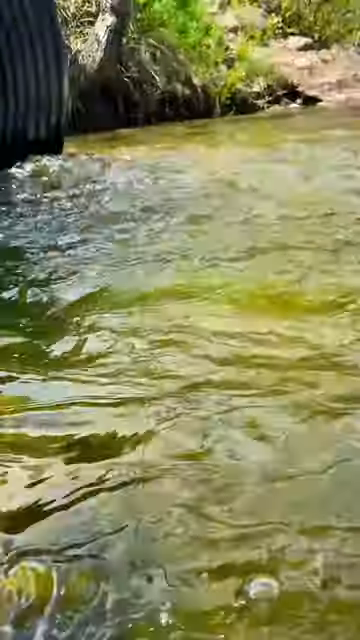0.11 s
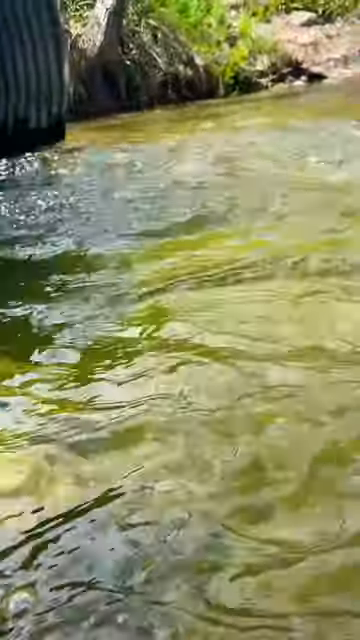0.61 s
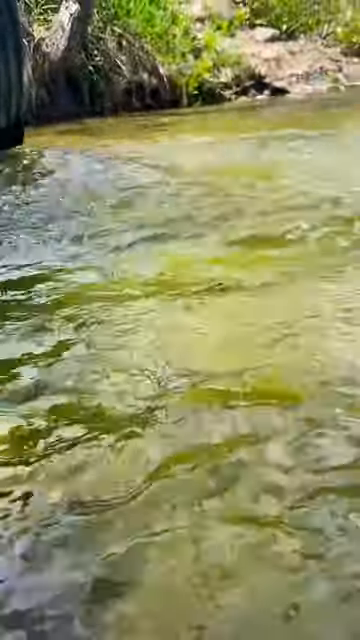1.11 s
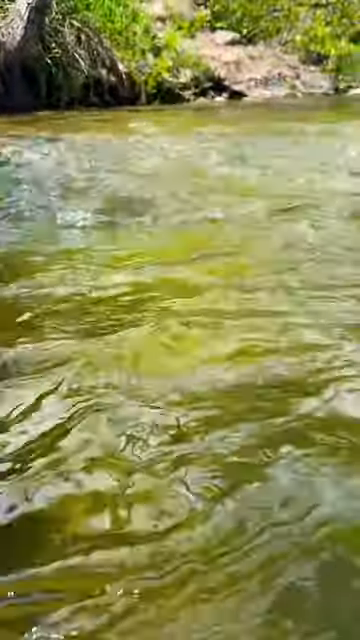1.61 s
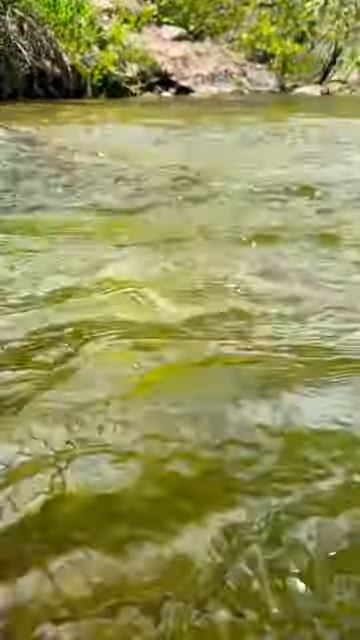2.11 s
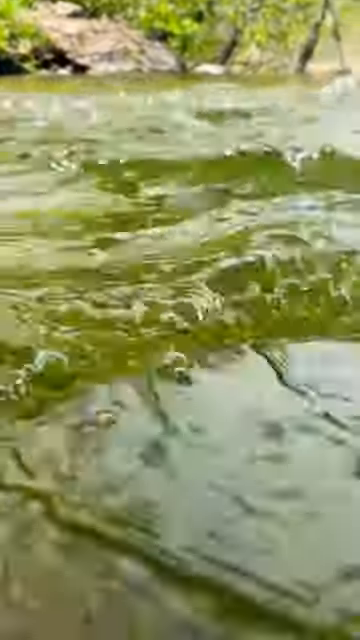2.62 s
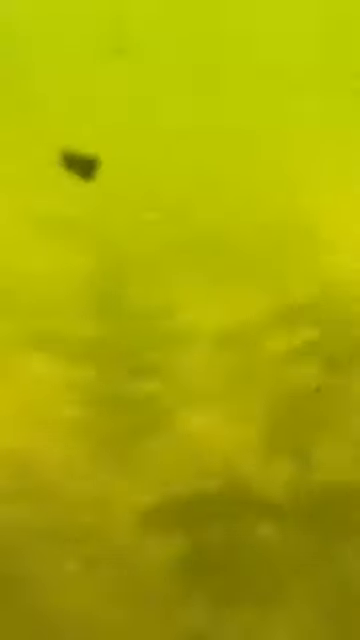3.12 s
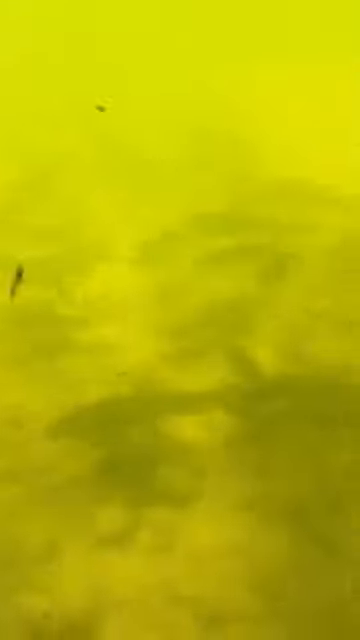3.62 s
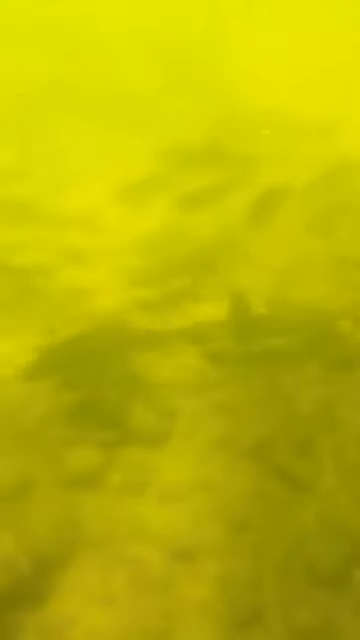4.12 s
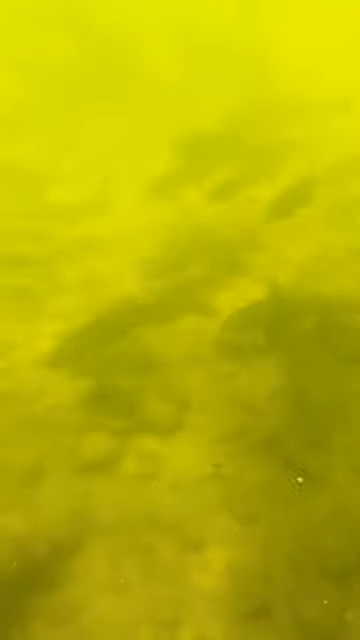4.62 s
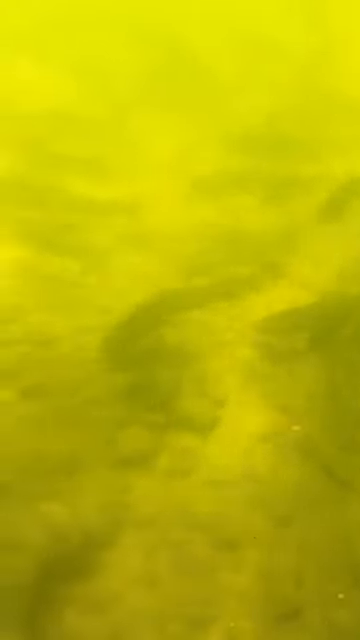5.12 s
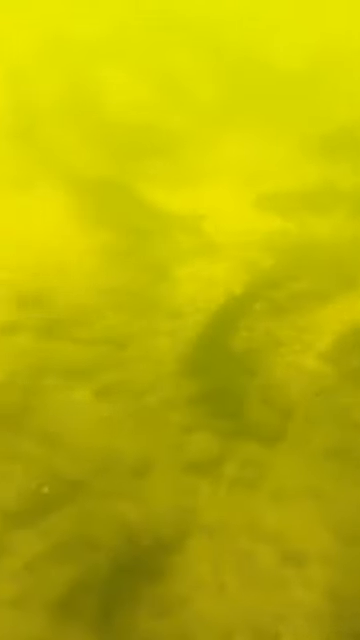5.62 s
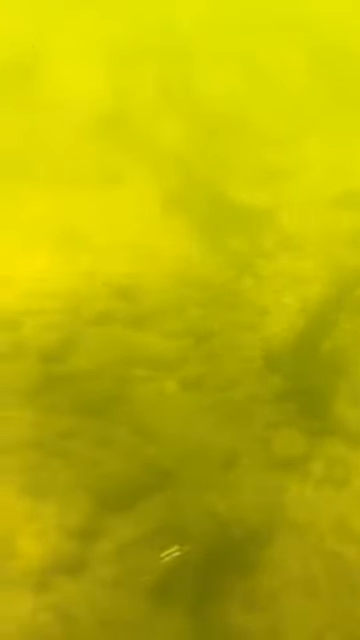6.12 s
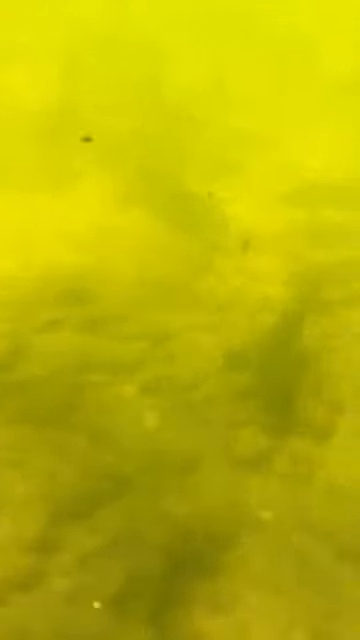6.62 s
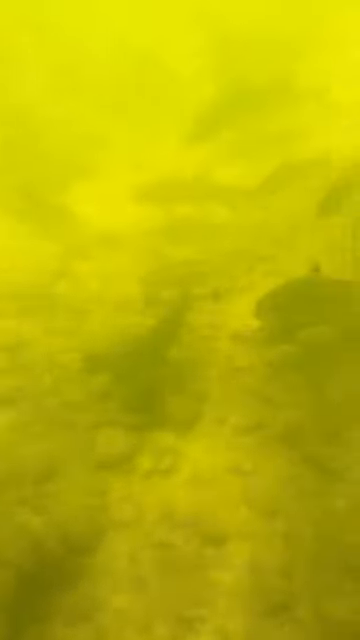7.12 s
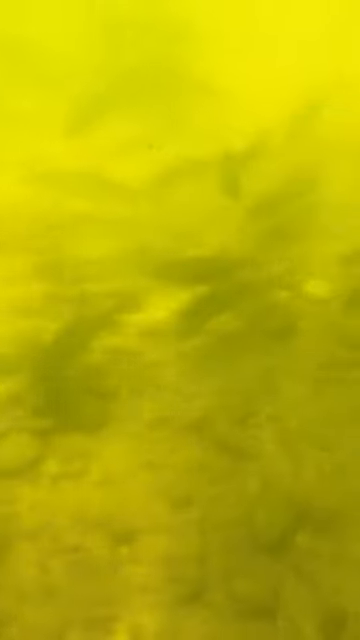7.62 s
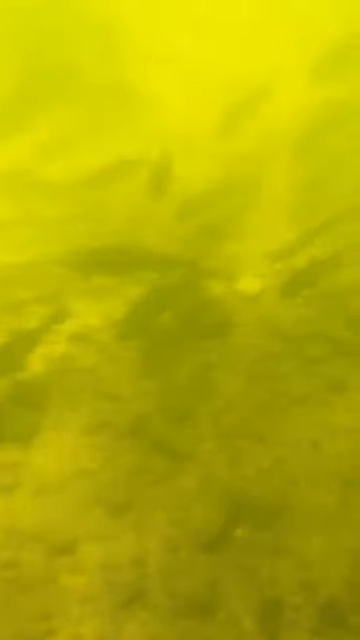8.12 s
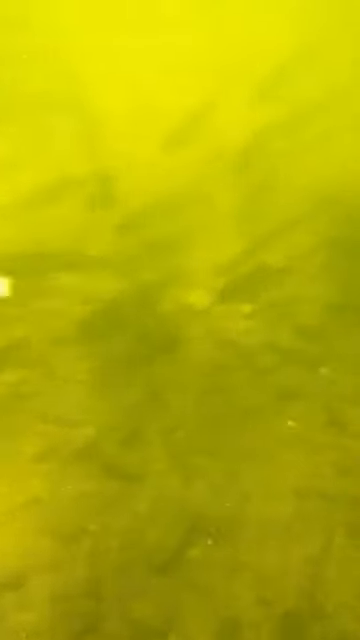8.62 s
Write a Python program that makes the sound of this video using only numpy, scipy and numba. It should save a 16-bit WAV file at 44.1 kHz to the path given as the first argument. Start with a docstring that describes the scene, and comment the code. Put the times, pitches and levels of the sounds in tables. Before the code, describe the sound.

Very close stereo river sound: dense rushing water with bubbles at first, then a busy flurry of lapping, wet clicks, droplets and boomy blows as the water reaches the device. After about three seconds it submerges. Treble drops away sharply; current buffets the casing in a deep uneven rumble, with muffled thuds, small resonant pings, briefly humming trapped air and tiny grit ticks. The muffled sound continues to the end.

```python
"""A phone is held just above a fast river: broadband rush, resonant bubbles, knocks and eddies on the housing.
From about 1.3 s waves slap and spatter it: droplets ring its ports and dull clicks of opposite sign part the sides.
Near 3.1 s it is pushed under and the rush fades. Current still buffets the housing, dull knocks run through it
as dispersed bending waves, and the river is heard through the resonant air trapped in the ports,
with surges of gurgling, struck port rings, humming air pockets, ticks of grit and a few more dull clicks."""
import sys
import numpy as np
from scipy import signal
from scipy.fft import rfft, irfft, next_fast_len
from scipy.io import wavfile
from scipy.ndimage import uniform_filter1d, map_coordinates
from numba import njit

SR = 44100
rng = np.random.default_rng(int(sys.argv[2]) if len(sys.argv) > 2 else 0)


def file_out(sig):
    """Save sig as 16-bit WAV at sys.argv[1]."""
    # one column per channel
    cols = np.atleast_2d(sig).T
    # limit, then scale
    lim = np.clip(cols, -1, 1)
    pcm = np.round(lim * 32767).astype(np.int16)
    wavfile.write(sys.argv[1], SR, pcm)


def undo_db(level):
    """Turn decibels back into plain size, where 20 dB means ten times bigger."""
    steps = np.asarray(level, float) / 20
    return 10 ** steps


N = 385875
T = np.arange(N) / SR  # time of every sample [s]
LAPPING_S = (1.5, 2.96)  # span in which waves lap at the phone


def curve(table):
    """Linear interpolation: the columns of a time table at every sample."""
    s, *columns = np.transpose(table)
    return [np.interp(T, s, column) for column in columns]


def at(table, hz):
    """Spectral envelope: level at hz, interpolated over log frequency."""
    f, db = np.transpose(table)
    return np.interp(np.log(hz), np.log(f), db)


def unit(x):
    """Normalisation to an rms of 1."""
    return x / np.sqrt(np.mean(x ** 2))


def walk(rate):
    """Slow random modulation: levels held 1 / rate s, smoothed twice, of rms 1."""
    hold = int(SR / rate)
    steps = np.repeat(rng.standard_normal(N // hold + 1), hold)
    smooth = uniform_filter1d(uniform_filter1d(steps, hold), hold)
    return unit(smooth[:N])


def sparks(rate, spread_db):
    """Shot noise: random impulses, a few far larger than the rest; unrelated mid and side."""
    hit = rng.random((2, N)) < rate / SR
    size = undo_db(spread_db * rng.exponential(1, (2, N)))
    return unit(hit * rng.standard_normal((2, N)) * size)


def bend(hz):
    """Dispersion of bending waves: below 2 kHz each pitch is 1.9 cycles late, so the lows come last."""
    cycles = 1.9
    return np.exp(-2j * np.pi * cycles * np.log(np.minimum(hz / 2000, 1)))


def coloured(drive, colour, side, side_db, flicker_db, flicker_rate, edges_hz):
    """Source and filter: colours a mid and side drive into bands of left and right that flicker alone."""
    size = next_fast_len(N)
    hz = np.maximum(np.fft.rfftfreq(size, 1 / SR), 1)
    envelopes = undo_db(np.array([at(colour, hz), at(side, hz)]))
    spectra = rfft(drive, size) * envelopes * bend(hz)
    bands = []
    for k in range(len(edges_hz)):
        # triangular bands over log frequency; the outermost two stay open
        share = np.interp(np.log(hz), np.log(edges_hz), np.arange(len(edges_hz)) == k)
        flicker = undo_db(flicker_db * walk(flicker_rate))
        mid, apart = irfft(spectra * share, size)[:, :N] * flicker
        bands.append([mid + undo_db(side_db) * apart, mid - undo_db(side_db) * apart])
    return np.array(bands)


@njit
def rings(start, hz, t60, left, right, glide, rise, count, rate):
    """Damped oscillation: fading sines that swell over rise cycles and slide up by the share glide."""
    out = np.zeros((2, count))
    for e in range(len(start)):
        life = int(t60[e] * rate)
        step = 2 * np.pi * hz[e] / rate
        turn = np.exp(1j * step - np.log(1000) / life)  # falls 60 dB in one life
        slide = np.exp(1j * step * glide / life)
        z = 1 + 0j
        for i in range(min(life, count - start[e])):
            z *= turn
            turn *= slide
            swell = min(i * hz[e] / rate / rise, 1.)
            v = z.imag * swell * swell * (3 - 2 * swell)
            out[0, start[e] + i] += left[e] * v
            out[1, start[e] + i] += right[e] * v
    return out


def ring(rows, glide, rise):
    """Superposition of damped rings: (time [s], level [dB], pitch [Hz], t60 [s], left minus right [dB])."""
    s, db, hz, t60, pan_db = np.array(rows, float).T
    start = (s * SR).astype(int)
    left, right = undo_db(db + pan_db / 2), undo_db(db - pan_db / 2)
    life = np.maximum(t60, 2 / hz)  # at least two cycles
    return rings(start, hz, life, left, right, glide, rise, N, 1. * SR)


def swarm(count, low_hz, high_hz, t60, slope, spread_db, glide, rise):
    """Random superposition of rings, higher ones shorter (t60 [s] at 1 kHz); unrelated mid and side."""
    c = rng.random((count, 5)).T
    hz = low_hz * (high_hz / low_hz) ** c[1]
    life = t60 * (.5 + c[3]) * (1000 / hz) ** slope
    # equal energy per Hz, then a random spread
    db = 10 * np.log10(hz / life) - spread_db * np.log(c[2])
    which = 80 * np.sign(c[4] - .5)  # 80 dB apart: each ring goes to one drive alone
    return unit(ring(np.transpose([c[0] * T[-1], db, hz, life, which]), glide, rise))


def scatter(span_s, db, low_hz, high_hz, count):
    """Random point process crowding towards the end of the span: rows (time [s], level [dB], pitch [Hz])."""
    c = rng.random((count, 3)).T
    s = span_s[0] + (span_s[1] - span_s[0]) * c[0] ** .6
    level = db + 12 * (c[1] - .5)
    hz = low_hz * (high_hz / low_hz) ** c[2]
    return np.transpose([s, level, hz])


def add(out, s, sound):
    """Superposition: mixes a short sound in at s seconds."""
    i = int(s * SR)
    out[:, i:i + sound.shape[-1]] += sound[..., :N - i]


def lag(x, samples):
    """Arrival-time difference: delays the right channel by a fractional number of samples."""
    right = map_coordinates(x[1], [np.arange(N) - samples], order=5, mode="nearest")
    return np.array([x[0], right])


# river through the air: (time [s], low rush level [dB], share of the ports covered by water [0-1])
RIVER_IN_AIR = [(0.0, -31.5, 0.24), (0.6, -35, 0.04), (1.5, -33, 0.2), (1.75, -33.5, 0.07),
                (2.02, -32, 0.01), (2.19, -28, 0.07), (2.2, -34.5, 0.1), (2.38, -33, 0.13),
                (2.54, -28, 0.28), (2.57, -33, 0.21), (2.72, -31.5, 0.28), (2.77, -35, 0.3),
                (2.8, -36, 0.32), (2.83, -30.5, 0.46), (2.89, -30, 0.58), (2.92, -32.5, 0.5),
                (2.96, -30.5, 0.28), (3.01, -32, 0.56), (3.035, -42, 0.35), (3.06, -46.5, 0.4),
                (3.1, -51, 0.44), (3.15, -46, 0.77), (3.2, -51, 0.9)]
# spectrum of the rush in the mid channel: (frequency [Hz], relative density [dB])
RUSH_COLOUR = [(71, -53.5), (120, -36.5), (184, -2), (250, -1.5), (330, -1.5), (670, -4), (1320, -11.5),
               (1720, -10), (2000, -12), (2300, -16), (3050, -20), (3900, -19.5), (4500, -24.5),
               (5300, -20.5), (6240, -26), (7500, -76.5), (9020, -36), (11500, -43.5), (13000, -73),
               (16000, -53)]
# spectrum of the rush in left minus right: (frequency [Hz], relative density [dB])
RUSH_SIDE_COLOUR = [(71, -44), (120, -16.5), (192, -6.5), (656, -0.5), (1030, 0), (1860, -12), (2290, -1),
                    (3590, -9), (6370, -38), (9020, -30), (10600, -67), (12300, -34.5), (16000, -54)]


def river():
    """Turbulent broadband noise with a froth of short bubbles; water covering the ports absorbs the treble."""
    low_db, cover = curve(RIVER_IN_AIR)
    # levels with open ports, less what covered ports take away
    high_db = low_db + 4.5 - 29 * cover
    hiss_db = low_db - 12.5 - 22 * cover
    froth = swarm(count=16000, low_hz=146.0, high_hz=15050, t60=0.03, slope=0.54, spread_db=1.8,
                  glide=0.27, rise=2.2)
    # waves lapping at the phone break the rush into ever stronger gushes
    gush_db = 2.5 * np.interp(T, LAPPING_S, (0, 1))
    gushes = undo_db(gush_db * walk(22))
    drive = (1.69 * rng.standard_normal((2, N)) + froth) * gushes
    bands = coloured(drive, RUSH_COLOUR, RUSH_SIDE_COLOUR, -11, 1.0, 25.19,
                     [200, 450, 900, 1800, 3600, 6500])
    low = undo_db(low_db) * unit(bands[:2].sum(0))
    high = undo_db(high_db) * unit(bands[2:4].sum(0))
    hiss = undo_db(hiss_db) * unit(bands[4:].sum(0))
    above = np.clip((RIVER_IN_AIR[-1][0] - T) / 0.064, 0, 1)  # fades out as the phone goes under
    return above * (low + high + hiss)


# bubbles at the surface: (time [s], level [dB], pitch [Hz], ring t60 [s], left minus right [dB])
SURFACE_BUBBLES = [(0.302, -30.5, 975, 0.23, 5), (0.762, -18, 2160, 0.025, 16),
                   (0.811, -3, 710, 0.0094, -10), (1.345, -30, 660, 0.029, 8),
                   (1.517, -21.5, 1820, 0.021, 0), (1.554, -24.5, 730, 0.08, 4),
                   (1.626, -19.5, 2360, 0.0096, -4), (1.719, -20, 1330, 0.033, 0),
                   (1.76, -38, 3380, 0.011, -2), (1.785, -25, 2480, 0.011, -11),
                   (1.811, -20.5, 1847, 0.02, -12), (2.496, -12.5, 1856, 0.012, 3.5),
                   (2.941, -20, 2126, 0.01, -2), (2.943, -24, 760, 0.02, -2), (1.729, -14, 720, 0.017, -2),
                   (1.933, -21, 687, 0.045, -6), (2.055, -14, 624, 0.02, 0),
                   (2.153, -16, 1570, 0.031, -1.5), (2.791, -36, 796, 0.015, 0), (2.902, -21, 872, 0.02, 0),
                   (2.972, -27, 1550, 0.012, 0), (3.008, -26, 1100, 0.014, -1), (1.623, -21, 514, 0.09, -3),
                   (1.705, -28, 1400, 0.067, -3), (1.747, -24, 1750, 0.03, -10),
                   (1.985, -4.5, 2117, 0.0049, 0), (2.011, -19.5, 1429, 0.054, -6),
                   (2.044, -15.5, 1615, 0.041, -2.5), (2.074, -14.5, 1220, 0.02, -1),
                   (2.122, -15, 1310, 0.018, 2), (2.176, -11.5, 706, 0.029, -8),
                   (2.193, -25, 2886, 0.029, 0), (2.362, -15, 550, 0.02, 2), (2.246, -21, 860, 0.03, 4),
                   (2.291, -22, 520, 0.028, -9), (2.355, -34, 2140, 0.02, -8), (2.374, -26, 1910, 0.029, 0),
                   (2.423, -17, 290, 0.025, -1), (2.436, -17.5, 379.5, 0.017, 1),
                   (2.433, -28, 2850, 0.015, 1), (2.526, -22, 332, 0.03, -4.5),
                   (2.556, -27.5, 1750, 0.025, 0), (2.655, -25, 334, 0.04, -6),
                   (2.647, -30, 2770, 0.016, 3), (2.706, -20, 420, 0.025, -2),
                   (1.362, -21.5, 1930, 0.014, -2), (2.383, -7, 780, 0.015, -8),
                   (2.404, -15, 977, 0.013, -1.5), (2.448, -28, 2920, 0.016, 1),
                   (2.467, -18, 970, 0.016, 2), (2.495, -14.5, 534, 0.033, -2),
                   (2.544, -16.5, 710, 0.024, 16), (2.572, -32, 2850, 0.034, 2),
                   (2.747, -23, 744, 0.047, -4), (2.921, -16, 767, 0.029, 8.5),
                   (2.921, -25.5, 2860, 0.012, 2), (3.033, -30, 1300, 0.013, 4),
                   (3.11, -12, 494, 0.0095, -8), (3.143, -33, 1290, 0.0084, -4),
                   (3.111, -23.5, 1740, 0.0074, -3)]


def bubbles():
    """Volume resonance of a bubble: a damped sine whose pitch rises by 9.4 % over its life."""
    return ring(SURFACE_BUBBLES, 0.094, 1.4)


# droplets, and late on a tick of grit, on the ports: (time [s], level [dB], ring [Hz],
# top end against ring [dB], left minus right [dB])
PORT_TICKS = [(0.4513, -30, 4000, -25, -1), (0.7627, -40.5, 3940, -37, -33), (0.806, -29, 3640, -25, -14),
              (1.3545, -33, 4960, -36, 3), (1.5189, -35.5, 5130, -19, -15),
              (1.5524, -31.5, 3460, -9.5, -2.5), (1.6397, -26.5, 3260, -11, -8),
              (1.8088, -25.5, 3554, -14, -14), (1.8135, -25.5, 3300, -23, 5), (1.822, -32, 4700, -14, 1),
              (1.648, -25, 3500, -16, -2), (2.1, -21, 5330, -34, 2), (2.157, -32, 4800, -25, -1.5),
              (2.42, -29, 5300, -14.5, -1.5), (1.9495, -19, 4840, -30, -5), (1.9814, -23, 5570, -14.5, 1),
              (1.9878, -22, 5290, -28, -9.5), (2.024, -23, 3800, -19, 0.5),
              (2.0334, -30.5, 3850, -9.5, 4.5), (2.0924, -24, 5470, -20.5, -7),
              (2.1086, -16.5, 5310, -23, 0), (2.1204, -25, 4970, -30.5, -4), (2.149, -31, 4770, -33, -12),
              (2.1682, -28.5, 5300, -20.5, 4), (2.1868, -28.5, 5116, -29, -7),
              (2.3002, -31.5, 5600, -21.5, -1), (2.3245, -29, 3810, -27.5, -1),
              (2.374, -24.5, 3794, -15, -0.5), (2.39, -27, 5860, -26.5, -11.5),
              (2.4034, -23.5, 3340, -11.5, 0.5), (2.4134, -27.5, 5470, -26, -5),
              (2.4334, -25, 3905, -13, -1), (2.4656, -22, 3680, -12.5, 1.5),
              (2.4813, -20.5, 5543, -19.5, 8), (2.4954, -9, 5490, -26, -9), (2.5024, -9, 3880, -20, 0.5),
              (2.5084, -24, 3420, -16, -2.5), (2.5326, -23.5, 3850, -24.5, -8),
              (2.5424, -25, 5290, -19.5, 1), (2.6798, -27, 5740, -21, -1.5), (2.705, -31, 5136, -10.5, 1.5),
              (2.7342, -30.5, 3380, -7.5, -5.5), (2.8948, -22, 5250, -2.5, -2),
              (2.9025, -34, 5540, -16, 0.5), (2.9203, -26, 4700, -13, -4.5),
              (2.9407, -24.5, 3200, -12.5, 14), (2.9574, -36, 3680, -17, -2), (3.1433, -16.5, 3480, -42, 7),
              (3.1474, -27.5, 6400, -25, -3), (1.5235, -26, 3500, -33, -2), (6.642, -50, 5300, 1, -4)]


def port_ticks():
    """Impact excitation by droplets and a late grain of grit: a few ms of crackle through port resonances."""
    out = np.zeros((2, N))
    t = np.arange(800) / SR
    hz = np.fft.rfftfreq(len(t), 1 / SR)
    # a fine spray of fainter droplets, ever denser
    spray = scatter((1.1, 3.03), -39, 3600, 5600, count=24)
    rows = PORT_TICKS + [(*row, -10.5, 0) for row in spray]
    noises = rng.standard_normal((len(rows), len(t)))
    for (s, db, ring_hz, top_db, pan_db), noise in zip(rows, noises):
        own = np.exp(-((hz - ring_hz) / 600) ** 2)
        upper_port = undo_db(-16.5) * np.exp(-((hz - 5400) / 800) ** 2)
        lower_port = undo_db(-10.5) * np.exp(-((hz - 3900) / 500) ** 2)
        body = undo_db(-10) * np.exp(-(hz / 5000) ** 4)
        top = undo_db(top_db) * np.exp(-((hz - 11000) / 5000) ** 6)
        burst = noise * np.minimum(t / .0008, 1) * np.exp(-t / .0014)
        # 100 samples of room ahead for the filter's early ringing
        tick = irfft(rfft(np.roll(burst, 100)) * (own + upper_port + lower_port + body + top))
        gain = undo_db(db + np.array([[pan_db], [-pan_db]]) / 2)
        add(out, s - 100 / SR, tick / np.abs(tick).max() * gain)
    return out


# dull slaps and clicks of water at the ports, opposite in the two channels:
# (time [s], level before the left and right factors [dB], centre [Hz])
WATER_CLICKS = [(1.528, -21, 750), (1.81, -23, 1640), (1.977, -8.5, 1030), (1.994, -18, 1080),
                (2.013, -16, 1070), (2.055, -8.5, 835), (2.143, -10, 980), (2.179, -11, 850),
                (2.196, -17, 800), (2.38, -12, 1100), (2.403, -10.5, 1090), (2.433, -14.5, 1010),
                (2.495, -13, 1330), (2.509, -9, 1229), (2.542, -12, 1200), (2.66, -14, 1000),
                (2.679, -11.5, 1370), (2.746, -15, 1180), (2.79, -16, 720), (2.856, -17, 850),
                (2.901, -8.5, 1180), (2.92, -15, 900), (2.953, -14, 900), (3.112, -18.5, 1247),
                (5.838, -37, 846), (6.26, -33, 522), (6.682, -34, 699), (7.944, -33, 564)]


def water_clicks():
    """Antiphase excitation: dull slaps and clicks of water at the ports, opposite in the two channels."""
    out = np.zeros((2, N))
    hz = np.maximum(np.fft.rfftfreq(2048, 1 / SR), 1)
    rows = WATER_CLICKS + list(scatter(LAPPING_S, -20.5, 600, 1200, count=12))
    sides = np.array([[1.15], [-.85]])
    for (s, db, centre_hz), noise in zip(rows, rng.standard_normal((len(rows), 2048))):
        burst = noise * np.exp(-np.arange(2048) / SR / 0.0022)
        dull = np.exp(-(np.log(hz / centre_hz) / .75) ** 2 - (hz / 3000) ** 2)
        click = irfft(rfft(np.roll(burst, 200)) * dull * bend(hz))
        add(out, s - 200 / SR, undo_db(db) * click / np.abs(click).max() * sides)
    return out


# slaps and knocks on the housing: (time [s], level [dB], boom [Hz],
# sharp part [dB] before its factor boom / 600 Hz, left minus right [dB])
HOUSING_KNOCKS = [(0.03, -27.5, 89, -2, 4), (0.252, -17, 72, -21, 0.5), (0.254, -16.5, 210, -11, 1),
                  (0.679, -25, 195, 19, -7), (1.504, -22.5, 188, 9, 4), (1.625, -17.5, 201, 19, -3),
                  (1.991, -20.5, 111, -12, -1), (2.144, -6.5, 143, 5, 3), (2.156, -0.5, 74, -0.5, 1),
                  (2.361, -19.5, 88.5, 12, -2), (2.404, -12.5, 93, 1, 2), (2.437, -23, 60.2, 27, 7),
                  (2.467, -15.5, 90, -4, 4), (2.496, -18.5, 110, 16, 3), (2.514, -10, 68, -26, 2.5),
                  (2.543, -20, 51, 16, 8), (2.619, -12, 80, -4.5, -1.5), (2.648, -18, 76, 11, 4),
                  (2.697, -21, 110, -9, 2), (2.767, -17, 115, -6, 3), (2.789, -19, 110, 3, 3),
                  (2.802, -15.5, 95, -12, 1), (2.898, -17.5, 110, 2, -5), (2.952, -14, 132, -14, -2.5),
                  (2.969, -12.5, 115, -6.5, -3), (2.982, -26, 72, 0, 2), (3.004, -15.5, 120, -2.5, 2),
                  (3.039, -21, 88, -18, 2), (3.068, -26, 85, -16, 1), (3.111, -30, 77, 11, -12),
                  (3.145, -10.5, 168, -8.5, -1.5), (3.18, -18.5, 70, -12, 1), (3.381, -24, 53.8, -23, -0.5),
                  (3.512, -23, 72.7, -18, -3), (3.738, -20, 51.1, -25, 0.5), (3.87, -28, 91.5, -20, 0.5),
                  (4.088, -21, 56.4, -32, -1), (4.263, -17, 86, -20, 1), (4.352, -23, 95.7, -33.5, 1),
                  (4.802, -24, 88.8, -28, -1.5), (5.84, -19.5, 117, -12, -3.5),
                  (5.947, -23.5, 105, -22, -3), (6.26, -18.5, 109.7, -7, -5.5), (6.281, -19, 115, -11, -4),
                  (6.299, -24, 136, -4, -4), (6.325, -31, 140, -13, 4), (6.352, -22, 125, -18, -4),
                  (6.376, -20.5, 103.5, -11, -3.5), (6.474, -20.5, 114.3, -19, 0.5),
                  (6.688, -21, 90, -12, 0), (6.708, -21.5, 84.5, -21, 5), (6.757, -18, 62, -22.5, -4),
                  (6.801, -27, 95.4, -21, -4), (7.014, -15.5, 109.2, -14.5, 3.5),
                  (7.072, -26.5, 62, -26, 2), (7.253, -21.5, 100, -12.5, 5), (7.541, -29, 70, -22, 0),
                  (7.84, -13.5, 121.1, -17, -5.5), (7.961, -22.5, 62, -4, 3.5), (8.318, -25, 99.6, -23, 3),
                  (8.481, -31, 117, -39, 5)]


def knocks():
    """Dispersion of an impulse: each blow is one push, a sharp front with the boom sweeping down behind it."""
    out = np.zeros((2, N))
    hz = np.maximum(np.fft.rfftfreq(16384, 1 / SR), 1)
    for s, db, boom_hz, sharp_db, pan_db in HOUSING_KNOCKS:
        boom = np.exp(-(np.log(hz / boom_hz) / 0.43) ** 2)
        sharp = undo_db(sharp_db) * boom_hz / 600 * np.exp(-(np.log(hz / 330) / .5) ** 2)
        blow = irfft((boom + sharp) * bend(hz))[:8192]
        gain = undo_db(db + np.array([[pan_db], [-pan_db]]) / 2)
        add(out, s - .004, gain * blow / np.abs(blow).max())
    return out


# current against the housing: (time [s], level [dB])
BUFFET_LEVEL = [(0.0, -34.5), (0.83, -39.5), (1.85, -40.5), (2.04, -31.5), (2.19, -34), (2.46, -20),
                (2.53, -21.5), (2.58, -22.5), (2.87, -20.5), (3.02, -16.5), (3.17, -30.5), (3.36, -30),
                (4.2, -32), (4.5, -34), (5.04, -32.5), (5.45, -29), (5.7, -34), (6.41, -30), (6.95, -32),
                (7.6, -32), (8.09, -28.5), (8.75, -33.5)]
# spectrum of the buffeting, mid and side alike: (frequency [Hz], relative density [dB])
BUFFET_SPECTRUM = [(15, -30.5), (25, -2.5), (48, -1.5), (108, -4), (132, -5.5), (194, -20.5), (220, -22),
                   (290, -47), (480, -120)]
# how unevenly the current loads the two sides: (time [s], side against mid [dB])
BUFFET_UNEVENNESS = [(0, -18), (3.2, -29.5), (5.63, -28.5), (5.68, -11.5), (8.75, -6)]


def buffet():
    """Turbulent wall pressure: eddies push the housing in soft random blows over a steady shake."""
    drive = sparks(200, 0.93) + 1.2 * rng.standard_normal((2, N))
    side_db = curve(BUFFET_UNEVENNESS)[0]
    bands = coloured(drive, BUFFET_SPECTRUM, BUFFET_SPECTRUM, side_db, 1.76, 9, [45, 110])
    return unit(bands.sum(0)) * undo_db(curve(BUFFET_LEVEL)[0])


# port resonances struck under water: (time [s], level before wavering [dB], pitch [Hz], left minus right [dB])
PORT_PINGS = [(3.144, -25.5, 570, -2), (3.18, -31, 550, -3), (3.38, -41.5, 905, -3), (3.863, -47, 3030, 7),
              (3.892, -54, 1030, 0), (4.019, -40.5, 988, -4), (4.247, -36.5, 518, -3),
              (4.585, -33, 990, -3), (4.647, -35.5, 970, 3), (4.8, -34, 561, -4.5), (4.829, -28, 920, 2.5),
              (4.889, -40, 1414, -14), (5.061, -34.5, 440, -9), (5.077, -35.5, 1670, 6.5),
              (5.177, -39.5, 940, 0), (5.259, -35.5, 980, 2), (5.307, -36, 977, 2.5),
              (5.375, -26.5, 990, 2.5), (5.432, -37, 943, 0.5), (5.491, -43.5, 1290, -4),
              (5.513, -42, 1284, -8), (5.535, -41.5, 1434, -13), (5.668, -46, 1700, -7),
              (6.087, -47.5, 1770, -7), (6.692, -49, 2190, 0.5), (7.941, -41.5, 1527, -7),
              (8.521, -43, 1690, -2.5), (5.571, -37, 960, 0), (5.624, -39, 1052, 11),
              (5.75, -36.5, 983, 5.5), (5.885, -39.5, 1450, -20), (5.944, -36, 855, 1),
              (6.044, -38, 580, -3), (6.155, -43, 1114, 0.5), (6.277, -47, 1950, 2), (6.345, -48, 563, 5),
              (6.557, -45, 1820, -1), (6.61, -39, 480, -2), (5.523, -49.5, 3070, 3), (5.047, -52, 2980, 0),
              (8.0, -50.5, 2310, 1), (6.237, -34, 1010, 1), (6.253, -33, 420, -9.5),
              (6.271, -29.5, 1030, 0), (6.298, -28.5, 950, 0), (6.379, -36, 492, -5),
              (6.491, -35.5, 1047, -2), (6.666, -37.5, 857, -0.5), (6.735, -38, 830, 1),
              (6.843, -33, 888, -1), (7.009, -34, 780, -2.5), (7.038, -32.5, 514, -6),
              (7.253, -36.5, 1490, -8), (7.293, -41, 576, -9), (7.422, -40, 1033, 2.5),
              (7.422, -35, 570, -4), (7.536, -23.5, 528, -5), (7.669, -37.5, 1203, -4.5),
              (7.716, -31.5, 477, -9), (7.724, -33, 1076, 3.5), (7.839, -35.5, 493, -6),
              (7.943, -31, 453, 3), (8.201, -40.5, 427, -15), (8.282, -33.5, 480, -4),
              (8.349, -45, 1047, 1), (8.138, -38, 927, -5), (8.386, -39, 1165, -4.5),
              (8.582, -44.5, 2590, 3)]


def pings():
    """Cavity resonance with damping that grows with pitch; moving water makes the rings waver."""
    struck = []
    for s, db, hz, pan_db in PORT_PINGS:
        t60 = 0.069 * (1000 / hz) ** 0.63  # s
        struck.append((s, db, hz, t60, pan_db))
    return ring(struck, 0.019, 6.2) * undo_db(2.8 * walk(90))


# air pockets humming after a knock: (time [s], level before wavering [dB], pitch [Hz], ring t60 [s],
# left minus right [dB])
AIR_POCKETS = [(3.31, -37, 244, 0.72, -4), (6.265, -35, 305.2, 0.66, 0), (6.37, -39, 327, 0.39, 1),
               (6.55, -44, 314, 0.91, -8.5)]


def pockets():
    """Low resonance of a large air volume: it hums on after a knock, slowly wavering."""
    return ring(AIR_POCKETS, 0.032, 11.0) * undo_db(3.0 * walk(30))


# grains of grit on the ports under water: (time [s], level [dB], pitch [Hz], left minus right [dB])
GRIT_GRAINS = [(3.3116, -55, 4820, -1.5), (3.5006, -55, 4810, -1), (3.7226, -58.5, 5650, -3.5),
               (3.808, -54.5, 6060, -9), (4.0404, -57, 5360, -3), (4.15, -57.5, 6100, 1),
               (4.673, -56, 5960, 1.5), (4.8221, -54, 5130, -8), (5.3504, -63, 5750, -3.5),
               (6.3227, -50, 3950, 8), (6.6335, -54, 4940, -3), (7.6318, -54, 4370, -5),
               (7.7764, -47, 3880, 6), (7.8972, -57, 3990, 0), (7.9236, -59, 4030, -2),
               (8.611, -63, 6300, -2)]


def grains():
    """Impact resonance: each grain of grit ticks as an 11 ms ring."""
    return ring([(s, db, hz, .011, pan_db) for s, db, hz, pan_db in GRIT_GRAINS], .03, 9.)


# surges of gurgling: (time [s], level each adds to the gain [dB], decay t60 [s])
GURGLE_SURGES = [(3.0, -22, 0.3), (3.14, -40.5, 0.78), (3.319, -43.5, 1.5), (3.59, -43, 0.7),
                 (3.98, -44, 0.25), (6.28, -34.5, 1.26), (7.29, -48, 0.38), (7.84, -45, 1.5),
                 (8.2, -44, 0.37), (8.57, -46, 0.31)]


def surges():
    """Sum of powers: the gain of the gurgle, steady plus swells that rise fast and die away exponentially."""
    power = undo_db(-53.5) ** 2
    for s, db, t60 in GURGLE_SURGES:
        rise = (s - T) / 0.05 / 3  # 20 dB in 0.05 s
        fall = (T - s) / t60
        power = power + undo_db(db - 60 * np.where(T < s, rise, fall)) ** 2
    return np.sqrt(power)


# river through the water: (time [s], lower port resonance [dB], upper port resonance [dB], top range [dB])
RIVER_IN_WATER = [(3.0, -52, -57, -59), (3.3, -51, -58.5, -64.5), (3.9, -50.5, -61, -61),
                  (4.6, -52.5, -57.5, -62), (5.26, -51, -60, -61), (5.55, -50, -54, -59),
                  (6.2, -54.5, -54.5, -61.5), (6.3, -55, -48, -61), (6.6, -48.5, -55, -63),
                  (7.0, -48.5, -54, -60.5), (7.4, -50, -59, -58.5), (7.84, -46, -52.5, -58),
                  (8.3, -46, -55.5, -60), (8.6, -48, -56, -59.5), (8.75, -47.5, -57.5, -56)]
# hiss under water: (time [s], level [dB])
WATER_HISS = [(3.0, -66.5), (3.3, -79), (3.7, -79), (4.2, -79.5), (4.6, -78), (5.1, -79.5), (5.42, -78),
              (5.7, -80.5), (6.25, -80.5), (6.4, -77.5), (6.75, -83.5), (7.3, -77), (7.7, -78.5),
              (7.8, -74.5), (7.97, -74.5), (8.1, -78.5), (8.3, -82.5), (8.55, -79), (8.75, -81)]
# spectrum of the river under water in the mid channel: (frequency [Hz], relative density [dB])
WATER_COLOUR = [(120, -47), (210, 1), (300, -8.5), (370, -17), (510, -1), (640, -10), (760, -22),
                (980, -8.5), (1180, -19.5), (1850, -22), (2300, -32.5), (3050, -38.5), (3500, -49.5),
                (4400, -56), (5600, -49), (6500, -51.5), (7100, -80.5), (9000, -56), (12000, -57.5),
                (13500, -80.5)]
# spectrum under water in left minus right: (frequency [Hz], relative density [dB])
WATER_SIDE_COLOUR = [(120, -35.5), (200, 2), (279, -14.5), (505, -2), (612, -13.5), (852, -17),
                     (1440, -6.5), (1970, -30), (2700, -23.5), (4100, -38.5), (5430, -33.5), (6460, -49.5),
                     (8850, -56), (10400, -56), (13000, -59)]


def drowned():
    """Resonant filtering: flow noise and distant bubbles excite trapped air, which favours two low resonances."""
    low_db, high_db, top_db = curve(RIVER_IN_WATER)
    blips = swarm(count=18000, low_hz=200, high_hz=3600, t60=.055, slope=.5, spread_db=1.7,
                  glide=.04, rise=9.)
    drive = rng.standard_normal((2, N)) + .85 * blips * undo_db(1.4 * walk(150) + 2.2 * walk(14))
    # fine grit ticks against the housing in uneven flurries, each grain with its own short ring
    grit = swarm(count=9000, low_hz=3000, high_hz=12000, t60=.05, slope=.9, spread_db=1.5,
                 glide=.03, rise=6.)
    drive += .6 * grit * undo_db(2.5 * walk(40) + 1.5 * walk(10))
    bands = coloured(drive, WATER_COLOUR, WATER_SIDE_COLOUR, -9.0, 0.58, 16,
                     [280, 520, 980, 1700, 2800, 4000, 10000])
    gurgle = surges() * unit(bands[0])
    lower = undo_db(low_db) * unit(bands[1])
    upper = undo_db(high_db) * unit(bands[2])
    top = undo_db(top_db) * unit(bands[3:5].sum(0))
    hiss = undo_db(curve(WATER_HISS)[0]) * unit(bands[5:].sum(0))
    below = np.clip((T - RIVER_IN_WATER[0][0]) / 0.13, 0, 1)
    return below * (gurgle + lower + upper + top + hiss)


def scene():
    """Superposition at the two ports; housing shake and the ticks on the ports reach the left one first."""
    housing = lag(buffet() + knocks(), 2.8)  # samples
    ticks = lag(port_ticks(), 8.3)  # samples
    water = river() + drowned() + grains() + bubbles() + pings() + pockets()
    return housing + water + water_clicks() + ticks


def low_pass(x):
    """Removes everything above the highest recorded frequency."""
    return signal.sosfilt(signal.butter(12, 17140, fs=SR, output="sos"), x)


def record(dry):
    """High-pass filtering and soft saturation: the phone cuts the lowest bass and rounds the loudest blows."""
    high_pass = signal.butter(3, 38, "high", fs=SR, output="sos")
    cut = signal.sosfilt(high_pass, dry)
    mix = np.tanh(1.28 * cut) / 1.112
    return low_pass(mix)


dry = scene()
out = record(dry)
file_out(out)
```